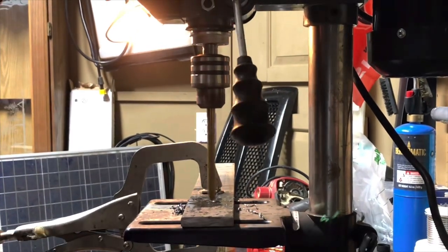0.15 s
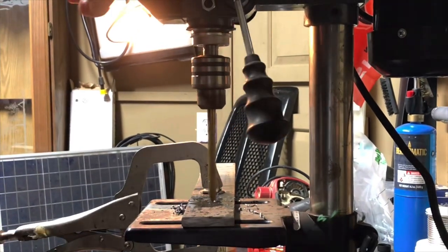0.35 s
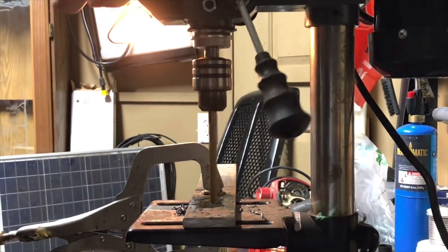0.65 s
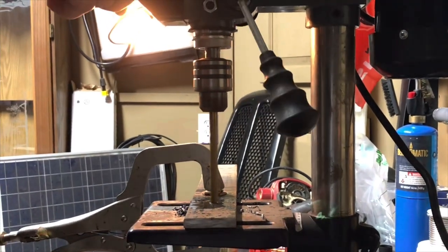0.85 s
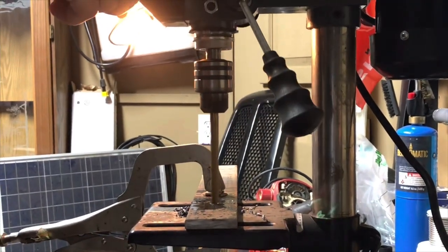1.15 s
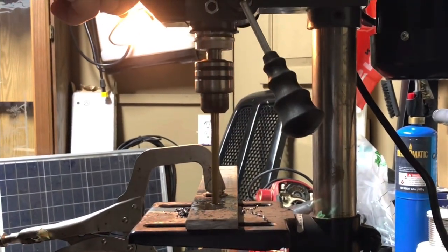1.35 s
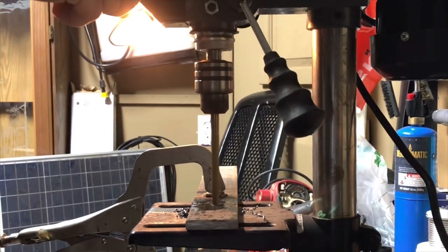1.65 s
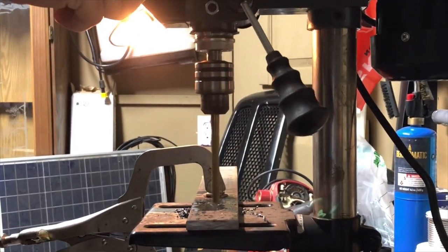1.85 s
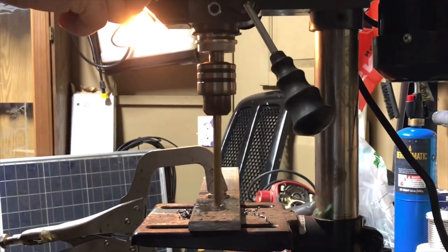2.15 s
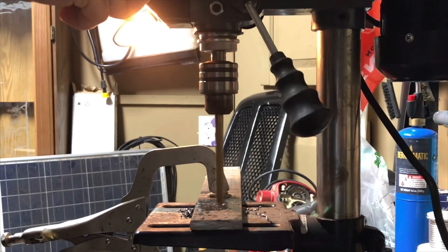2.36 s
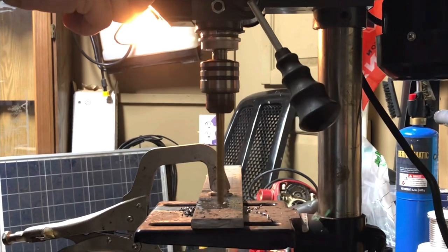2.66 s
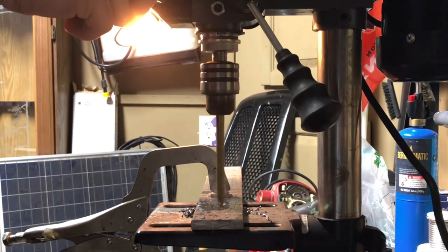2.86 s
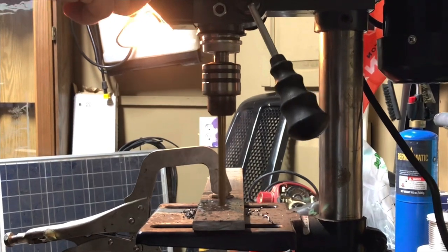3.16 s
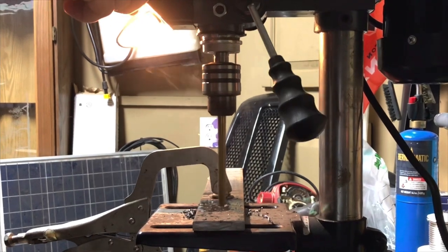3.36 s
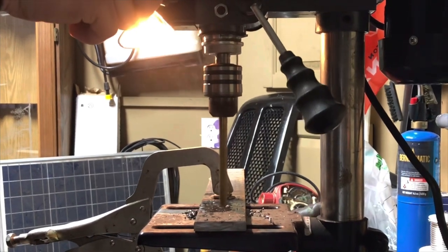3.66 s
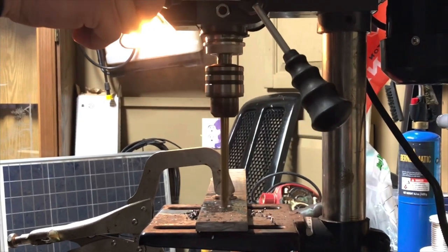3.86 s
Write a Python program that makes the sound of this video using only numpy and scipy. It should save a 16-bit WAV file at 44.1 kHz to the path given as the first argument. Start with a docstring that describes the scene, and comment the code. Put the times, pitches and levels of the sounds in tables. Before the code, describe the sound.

Close in a small garage workshop, a drill press hums and rattles for about a second, then its bit bites metal with rough, pulsing crunches, pausing twice before a long final cut.

```python
"""A benchtop drill press hums, rumbles and rattles, and three feeds into a clamped steel bar growl and crackle.
The motor hum is sine tones; belt rumble is noise, and the loose spindle's rattle is knocks that share its turning.
Under feed the slack is taken up and the rattle drops; the bit judders against the frame and chips crack off,
hardest once every turn. Swarf pings, the bit rings, stray chips and bearings tick, and two faint tones ring once.
Every source but the hum and that faint ring gets the echo of a small garage."""
import sys
import numpy as np
from scipy import signal
from scipy.fft import rfft, irfft
from scipy.io import wavfile
from scipy.ndimage import uniform_filter1d

SR = 44100
rng = np.random.default_rng(int(sys.argv[2]) if len(sys.argv) > 2 else 0)


def generate_wav(signal):
    """Clip the signal to [-1, 1] and save it as 16-bit WAV at the path in sys.argv[1]."""
    frames = np.transpose(np.atleast_2d(signal))
    scaled = np.clip(frames, -1, 1) * 32767
    pcm = np.round(scaled).astype(np.int16)
    wavfile.write(sys.argv[1], SR, pcm)


N = 176400  # samples, 4 s

SPINDLE_HZ, CATCH_S = 24.12, 1.2472  # turns per second; a moment when the edge catches
BITE_S = 0.014  # time for the edge to dig in
# Levels of the sources going into the recorder, in dB
JUDDER_DB, CHIP_DB, SHARD_DB, SNAP_DB = -22.5, -27.5, -32.5, -38
RATTLE_DB, BELT_DB, BEARING_DB, FLICK_DB = -40.5, -40.5, -52.5, -53.5
# The surge once a turn: strength before it is mixed with the bursts, and half width in turns (to 1/e)
CATCH_DB, CATCH_TURNS = 9, 0.077
CHIP_POWER = 1.1  # chips grow faster than the cutting force
FIRST_BITE_DB, FIRST_BITE_S = 3.5, 0.027  # most extra crackle as the edge breaks in, and how soon it settles
SHARDS_PER_S, SHARD_RING_S = 1000, 0.0017  # pings per second, and how long each takes to fade to 1/e
SHARD_LOW_HZ, SHARD_HIGH_HZ = 1993, 13970
SLACK_S, SLACK_DB = 0.194, -17  # the rattle stays damped this long after a feed, by this much
FAINT_RING_S = 1.8  # when the faint ring starts
ROOM_T60_S, ROOM_TREBLE_T60_S = 0.26, 0.14  # time for the echo to fall by 60 dB, below and above 3 kHz
TOP_HZ = 15800  # the recorder's upper limit

# Feeds of the bit, some only short touches: start/s, end/s, level/dB, level slope/(dB per s), lift-off/s
FEEDS = [(1.204, 1.213, -4.5, 3, 0.0095), (1.231, 1.586, .5, -5, 0.032), (2.06, 2.343, 2, -16, 0.031),
         (2.731, 2.778, -3.5, 16, .01), (2.759, 4.1, 0.5, -1, 0.051)]
# Colour of small dry ticks: f/Hz, relative level/dB
TICK_COLOUR = [(800, 3), (2500, -1.5), (3800, 2), (6600, 0.5), (7600, -9.5), (10200, -17.5), (12700, -20),
               (15700, -24)]


def feed(t):
    """Cutting force: a quick bite, a slow drift in pressure, then the bit lifts off."""
    force = np.zeros(N)
    for start, end, db, slope, lift in FEEDS:
        held = undb(db + slope * np.clip(t - start, 0, end - start))
        bite = np.clip((t - start) / BITE_S, 0, 1)
        release = np.exp(-np.maximum(t - end, 0) / lift)
        force = np.maximum(force, held * bite * release)
    return force


def judder(turns, force):
    """The edges stick and slip a few times a turn and shake the frame."""
    # Colour of the judder: f/Hz, relative level/dB
    judder_colour = [(50, -29), (95, -10), (150, -4), (205, -5), (270, 0), (450, -0.5), (600, -2.5),
                     (850, 1.5), (1500, -2), (1850, -6), (2900, -3.5), (4500, -16), (8000, -28)]
    slips = unit(1.7 + knocks(turns, count=4, scatter=.24, spread_db=1.5, decay_s=0.0038))
    swell = undb(0.54 * np.cos(2 * np.pi * turns))  # slightly stronger once a turn
    shake = force * slips * swell * clicks(rate=5000, spread_db=2.5)
    return undb(JUDDER_DB) * garage(ring(shake, judder_colour), wet_db=-8.5)


def chips(turns, force):
    """Tiny fractures come in short bursts and surge where the edge catches each turn; snaps ring the bit."""
    # Colour of the cracks: f/Hz, relative level/dB
    crack_colour = [(800, -26.5), (2500, -4), (4000, -2), (4900, -4), (5400, 1), (6600, 0.5), (7400, -10),
                    (9400, -9.5), (10200, -18), (11400, -9), (12800, -6), (13400, -17.5), (15700, -15)]
    offset = (turns + .5) % 1 - .5  # distance from the catch, in turns
    catch = undb(CATCH_DB + 2.3 * walk(22)) * np.exp(-(offset / CATCH_TURNS) ** 2) / 2
    bursts = unit(1.2 + knocks(turns, count=7, scatter=.25, spread_db=0.5, decay_s=0.0058))
    # Force above its own recent average marks the edge breaking in
    keep = np.exp(-1 / (FIRST_BITE_S * SR))
    recent = signal.lfilter([1 - keep], [1, -keep], force)
    fresh = np.clip(force - recent, 0, 1)
    stress = force ** CHIP_POWER * undb(FIRST_BITE_DB * fresh) * unit(catch + bursts)
    fractures = undb(CHIP_DB) * clicks(rate=4500, spread_db=3.5) + undb(SHARD_DB) * shards()
    return garage(ring(stress * fractures, crack_colour) + bit_ring(stress), wet_db=-10)


def shards():
    """Curls of swarf snap off and ping for a moment, each at its own pitch."""
    # One row a shard; the columns choose its time, pitch and level
    rows = rng.random((int(SHARDS_PER_S * N / SR), 3))
    age = np.arange(SR // 60) / SR
    hz = SHARD_LOW_HZ + (SHARD_HIGH_HZ - SHARD_LOW_HZ) * rows[:, 1:2] ** 1.3  # low pitches are likelier
    pings = undb(-18 * rows[:, 2:]) * np.exp(-age / SHARD_RING_S) * np.sin(2 * np.pi * hz * age)
    places = (rows[:, :1] * N).astype(int) + np.arange(len(age))
    return unit(np.bincount(places.ravel(), pings.ravel(), N)[:N])


def bit_ring(stress):
    """Snaps under stress strike the steel bit, whose ringing the cut damps."""
    # Modes of the bit held in the cut: f/Hz, relative level/dB, time to fall 60 dB/s
    bit_modes = [(5390, -11, .02), (6140, 6, 0.021), (6490, -4, 0.057), (6510, 6, .015), (11500, -19, .007),
                 (12350, -4, .007)]
    snaps = stress * clicks(rate=970, spread_db=3.5)
    bit = pluck(bit_modes, np.arange(SR // 8) / SR)
    return undb(SNAP_DB) * signal.fftconvolve(snaps, bit / np.sqrt(np.sum(bit ** 2)))[:N]


def faint_ring(t):
    """A faint steely ring of two high, decaying tones, shortly after the first long feed."""
    # Tones of the ring: f/Hz, level/dB, time to fall 60 dB/s
    ring_tones = [(4355, -48, 0.67), (6428, -43, 0.26)]
    return pluck(ring_tones, t - FAINT_RING_S)


def drive(t, turns):
    """The running machine: motor hum, plus belt and spindle noise heard through the frame."""
    # Colour of belt and rattle: f/Hz, relative level/dB
    idle_colour = [(25, -38), (40, -27), (52, -5), (75, 3), (100, -2), (145, -1.5), (205, -6), (240, -0.5),
                   (300, -1.5), (420, 2), (620, -0.5), (850, -3), (1100, -3.5), (1800, -8.5), (2700, -9),
                   (3700, -13), (4800, -20), (6600, -17), (7600, -25), (10300, -33), (12700, -30),
                   (13500, -35), (16000, -37)]
    noise = undb(RATTLE_DB) * spindle_rattle(t, turns) + undb(BELT_DB) * belt_rumble()
    return motor_hum(t) + garage(ring(noise, idle_colour), wet_db=-8)


def spindle_rattle(t, turns):
    """The loose spindle knocks about six times a turn until the cutting load holds it still."""
    loaded = np.max([(t > start) & (t < end + SLACK_S) for start, end, *_ in FEEDS], axis=0)
    loose = undb(SLACK_DB * uniform_filter1d(loaded * 1., SR // 100))  # each change takes 10 ms
    blows = knocks(turns, count=6, scatter=.2, spread_db=4.1, decay_s=0.0061)
    return loose * blows * clicks(rate=6000, spread_db=2.5)


def belt_rumble():
    """The belt's rumble is noise whose level wavers a little."""
    return undb(0.62 * walk(9.55)) * rng.standard_normal(N)


def motor_hum(t):
    """The motor hums in steady tones that waver a little in level and phase."""
    # Motor tones: f/Hz, typical rms level/dB
    hum_tones = [(119.6, -51), (598, -55)]
    hum = np.zeros(N)
    for hz, db in hum_tones:
        level = undb(db + 2 * walk(6.1)) * np.sqrt(2)  # a sine peaks at root 2 times its rms
        hum += level * np.sin(2 * np.pi * hz * t + 0.41 * walk(4.95))
    return hum


def flicks(t):
    """Loose chips flicked by the bit tick against it and the table."""
    # Stray chips: t/s, relative level/dB
    flick_times = [(.116, -8), (0.558, -6), (.674, -4.5), (0.861, -4), (0.885, -8), (.941, -2), (.985, 1.5),
                   (1.137, -8), (1.775, -7), (1.842, -18), (1.969, 0.5), (2.686, 1.5)]
    touch = sum(undb(db) * (t >= at) * np.exp(-np.abs(t - at) / .0045) for at, db in flick_times)
    ticks = unit(touch) * clicks(rate=11000, spread_db=5.5)
    return undb(FLICK_DB) * garage(ring(ticks, TICK_COLOUR), wet_db=-5.5)


def bearings(turns):
    """Small dry ticks from the chuck and its bearings, about three a turn."""
    ticks = knocks(turns, count=3, scatter=.3, spread_db=4, decay_s=.004) * clicks(rate=6000, spread_db=2)
    return undb(BEARING_DB) * garage(ring(ticks, TICK_COLOUR), wet_db=-3)


def garage(x, wet_db):
    """Direct sound plus a short diffuse tail whose treble dies sooner; power roughly kept."""
    t = np.arange(SR // 2) / SR
    noise = rng.standard_normal(len(t))
    low = signal.sosfilt(signal.butter(2, 3000, fs=SR, output="sos"), noise)
    high = signal.sosfilt(signal.butter(2, 3000, "high", fs=SR, output="sos"), noise)
    # Subtracting avoids a notch where the two filters meet
    tail = low * undb(-60 * t / ROOM_T60_S) - high * undb(-60 * t / ROOM_TREBLE_T60_S)
    tail = tail * (t > .002)  # the first echo comes after 2 ms
    wet = undb(wet_db)
    echo = signal.fftconvolve(x, tail / np.sqrt(np.sum(tail ** 2)))[:N]
    return (x + wet * echo) / np.hypot(1, wet)


def ring(x, colour):
    """Pass a force through the frame's resonances and a broad colour; it rings only after each blow."""
    # Resonances of column, table and bit: f/Hz, width/Hz, lift/dB
    frame = [(143.7, 14, 5), (170.6, 14, 6), (286.5, 35, 6.5), (314.7, 8, 5.5), (505, 70, 4),
             (693, 96, 4.5), (868, 67, 6), (1213, 30, 1), (1377, 114, 2), (1619, 176, 5), (2020, 99, 2),
             (2576, 140, 3.5), (2800, 65, -1.5), (3780, 220, 2.5)]
    f = np.maximum(np.fft.rfftfreq(2 * N, 1 / SR), 1)
    points = np.array(colour)
    db = np.interp(np.log(f), np.log(points[:, 0]), points[:, 1])
    for hz, width, lift in frame:
        db = db + lift / (1 + (2 * (f - hz) / width) ** 2)
    # Folding the cepstrum (the spectrum of the log spectrum) gives the quickest response with these levels
    cepstrum = irfft(np.log(unit(undb(db))))
    cepstrum[1:N] *= 2
    cepstrum[N + 1:] = 0
    return irfft(rfft(x, 2 * N) * np.exp(rfft(cepstrum)))[:N]


def pluck(modes, t):
    """Decaying modes struck at t = 0."""
    age = np.maximum(t, 0)
    return sum(undb(db - 60 * age / t60) * np.sin(2 * np.pi * hz * age) for hz, db, t60 in modes)


def knocks(turns, count, scatter, spread_db, decay_s):
    """Envelope of several knocks a turn, in an uneven pattern that roughly repeats; rms 1."""
    index = np.arange(int(turns[0] * count) - 1, int(turns[-1] * count) + 1)
    pattern = rng.uniform(-1, 1, count)
    chance = rng.standard_normal((len(index), 2))  # chance in timing and in strength
    place = (index + pattern[index % count] / 4 + scatter * chance[:, 0]) / count
    force = np.zeros(N + 1)
    np.add.at(force, np.searchsorted(turns, place), undb(spread_db * chance[:, 1]))
    force[0] = 0  # drop knocks due before the start; the slot past the end is cut below
    return unit(signal.lfilter([1], [1, -np.exp(-1 / (decay_s * SR))], force[:N]))


def clicks(rate, spread_db):
    """Random clicks, about rate per second, of scattered size and either sign; rms 1."""
    hit = rng.random(N) < rate / SR
    size = undb(spread_db * np.clip(rng.standard_normal(N), -2, 2))
    return unit(hit * rng.choice([-1, 1], N) * size)


def walk(rate):
    """Slow chance with a spread near 1, from rate random values a second, smoothed twice."""
    k = max(int(SR / rate), 1)
    steps = np.repeat(rng.standard_normal(N // k + 1), k)
    return np.sqrt(2) * uniform_filter1d(uniform_filter1d(steps, k), k)[:N]


def undb(db):
    """Decibels to gain."""
    return 10 ** (np.asarray(db) / 20)


def unit(x):
    """Scale to rms 1."""
    return x / np.sqrt(np.mean(x ** 2))


def scene():
    """One spindle drives the idle noise and, under feed, the cut."""
    # Hand pressure, varying in the long last feed (the first value holds before it): t/s, level/dB
    pressure = [(2.76, 0.5), (2.88, 1.5), (3.01, 0.4), (3.13, 0.68), (3.42, 0), (3.65, 1.5), (3.8, 2.95),
                (4.0, 1.2)]
    t = np.arange(N) / SR
    turns = (t - CATCH_S) * SPINDLE_HZ
    force = feed(t) * undb(np.interp(t, *np.transpose(pressure)))
    cut = judder(turns, force) + chips(turns, force)
    return (cut + faint_ring(t) + drive(t, turns) + flicks(t) + bearings(turns))[None]


def record(dry):
    """The recorder rounds the highest peaks and cuts the top."""
    ceiling = .65
    rounded = ceiling * np.tanh(dry / ceiling)
    return signal.sosfilt(signal.ellip(12, .1, 80, TOP_HZ, fs=SR, output="sos"), rounded)


dry = scene()
out = record(dry)
generate_wav(out)
```